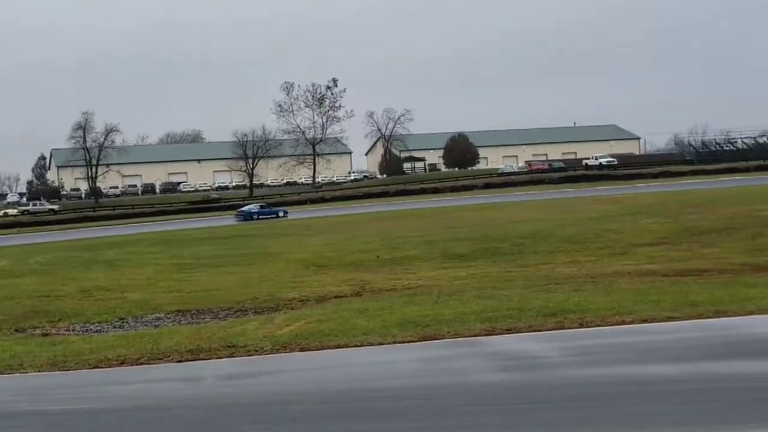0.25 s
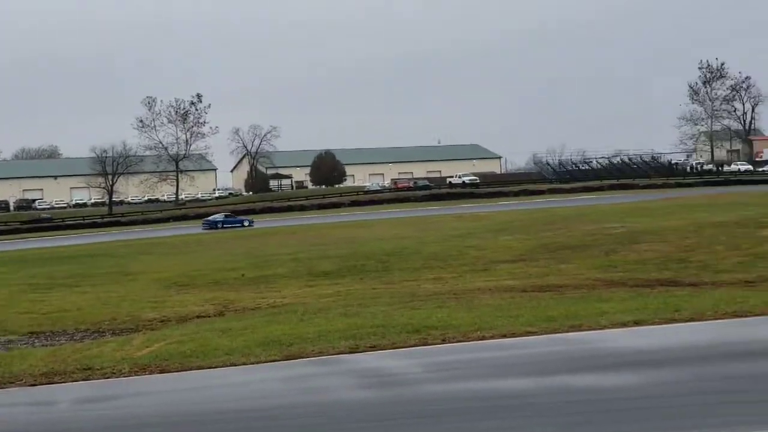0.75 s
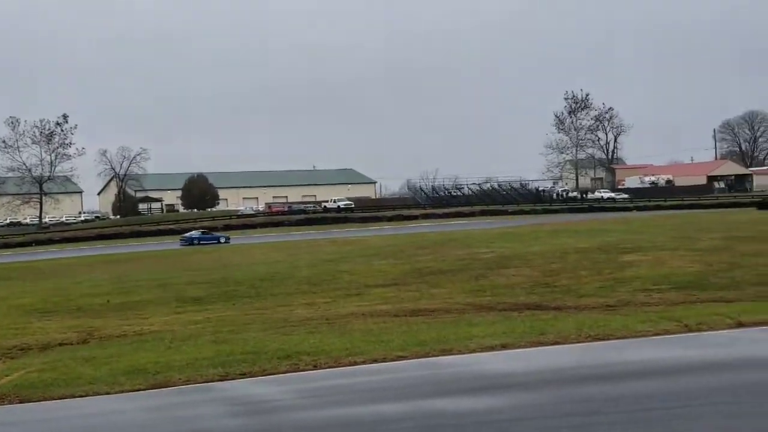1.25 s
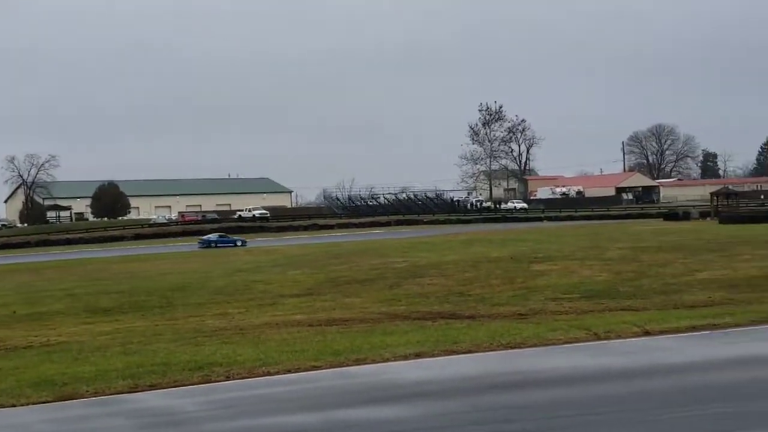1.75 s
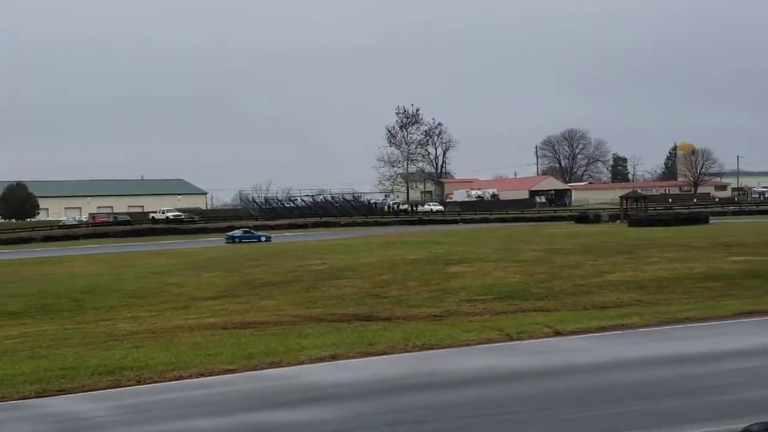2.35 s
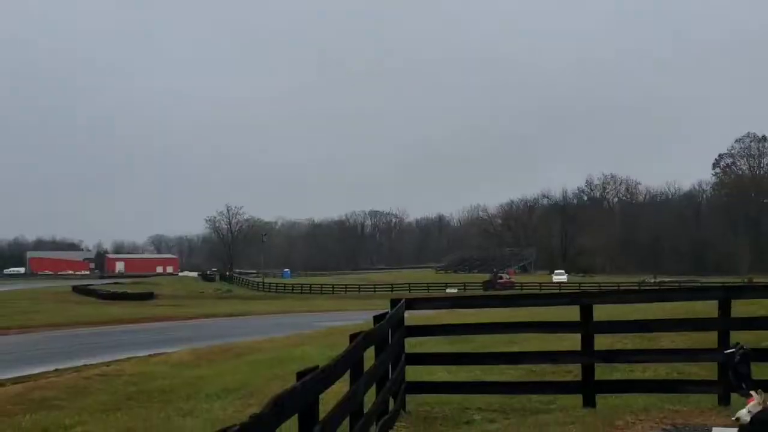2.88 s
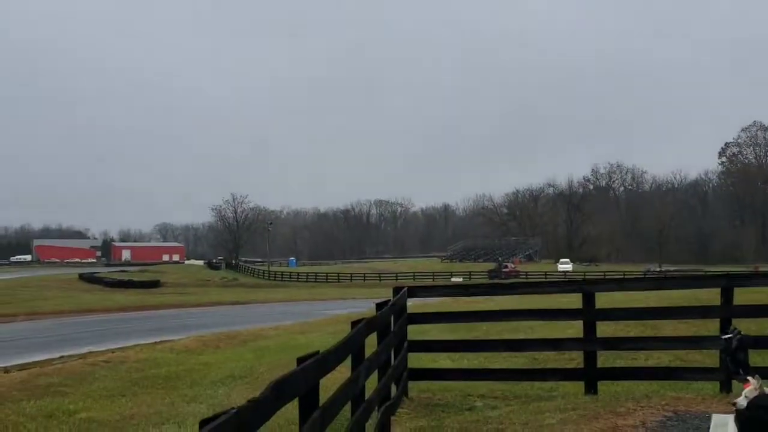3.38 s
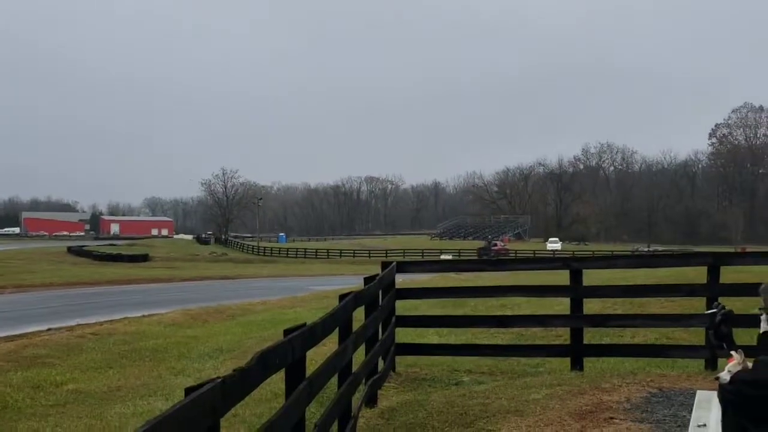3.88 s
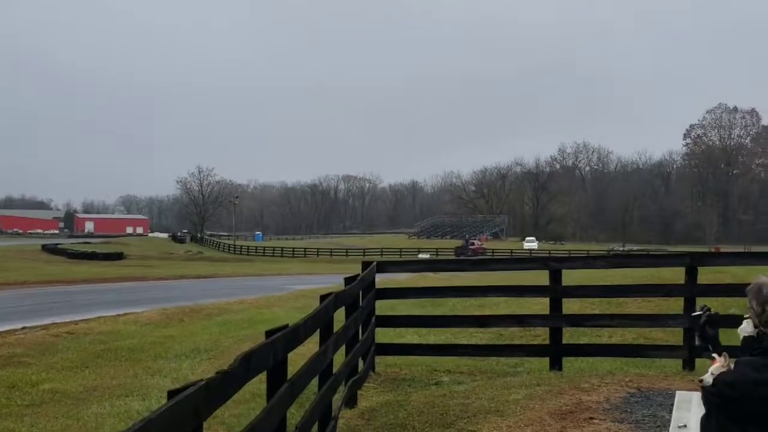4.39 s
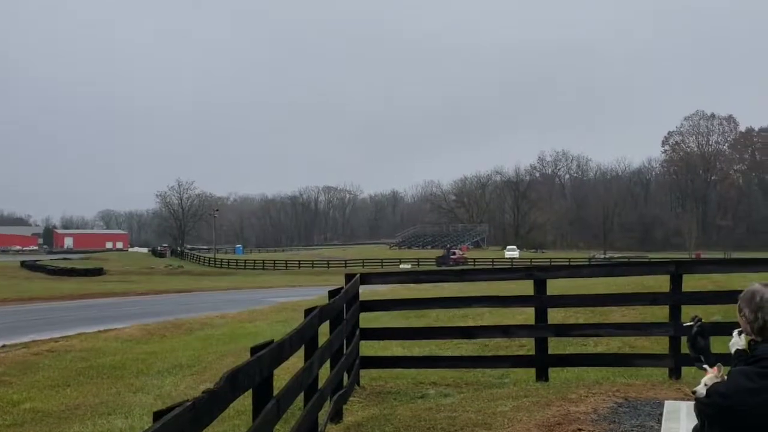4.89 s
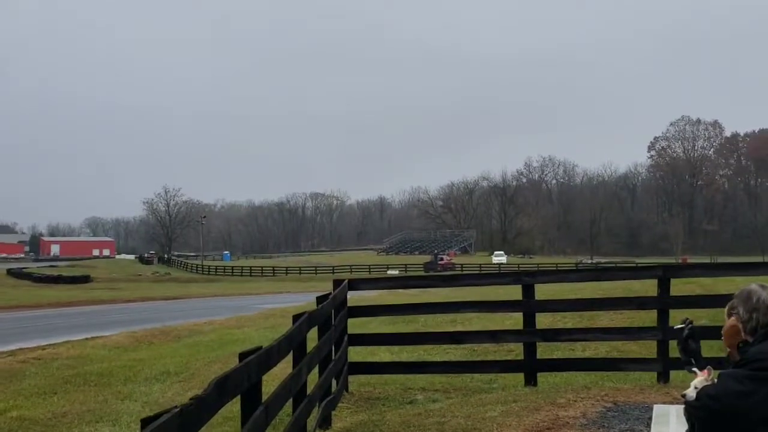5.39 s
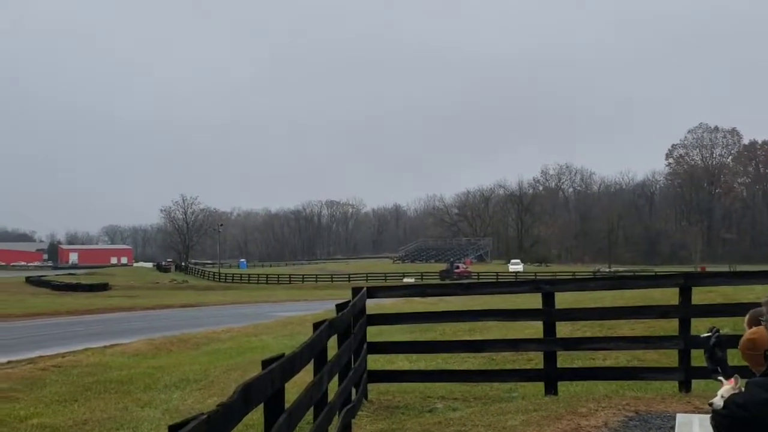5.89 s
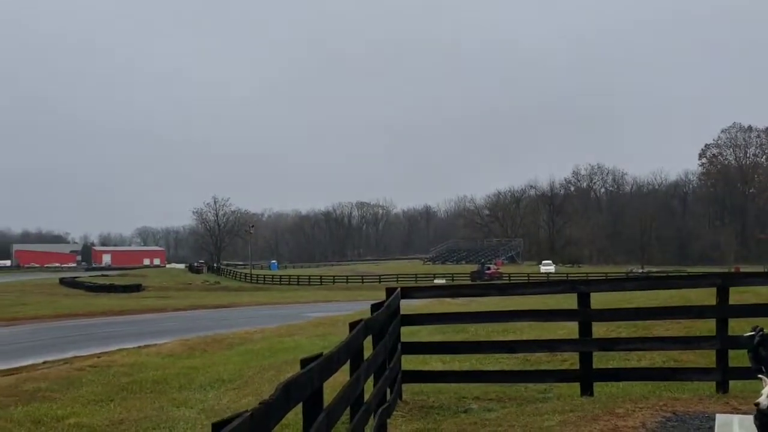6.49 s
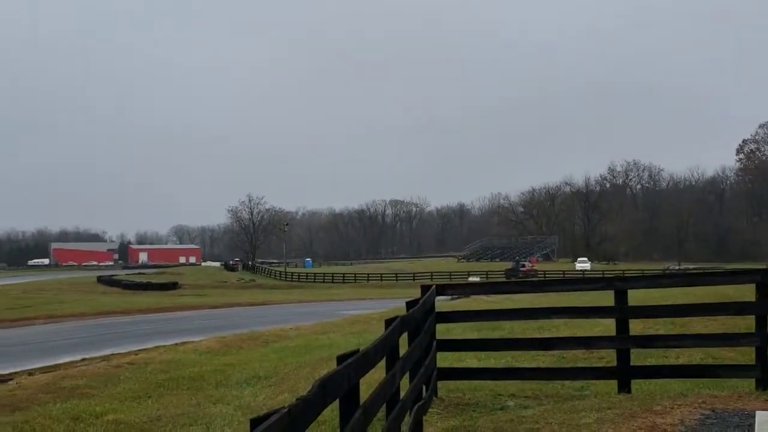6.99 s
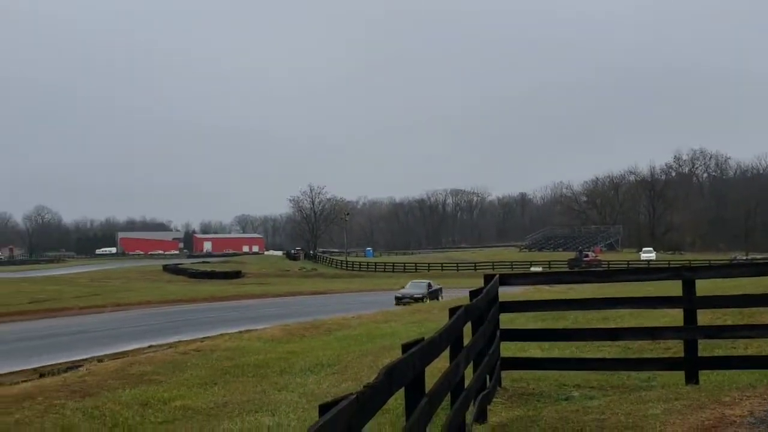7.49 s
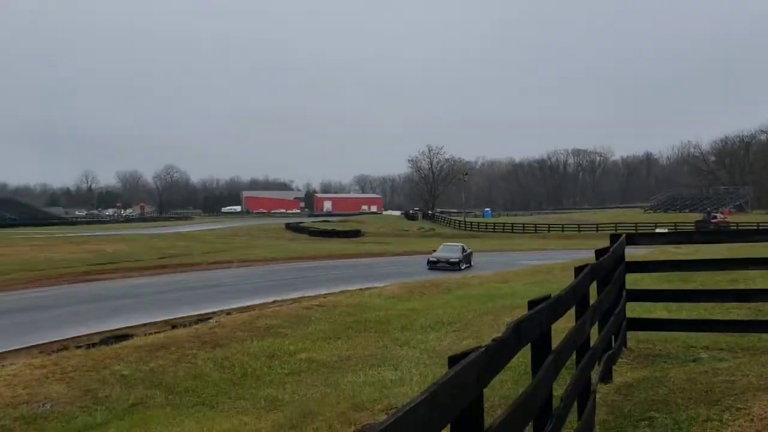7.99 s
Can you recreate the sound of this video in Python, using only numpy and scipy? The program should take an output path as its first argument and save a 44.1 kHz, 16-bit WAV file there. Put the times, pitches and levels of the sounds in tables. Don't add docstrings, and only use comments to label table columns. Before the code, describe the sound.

A car engine barks on and off throttle on a wet track, then a cut to distant revving engines and ragged tyre squeals over wet-road roar.

```python
import sys
import numpy as np
from scipy import signal
from scipy.fft import rfft, irfft, next_fast_len
from scipy.io import wavfile
from scipy.ndimage import uniform_filter1d

SR = 44100
rng = np.random.default_rng(int(sys.argv[2]) if len(sys.argv) > 2 else 0)


def generate_wav(signal):
    frames = np.transpose(np.atleast_2d(signal))
    scaled = np.clip(frames, -1, 1) * 32767
    pcm = np.round(scaled).astype(np.int16)
    wavfile.write(sys.argv[1], SR, pcm)


def voltage_ratio(level):
    return 10 ** (np.asarray(level, float) / 20)


N = 363823
TIME = np.arange(N) / SR
SECOND_SHOT_S = 2.886


def read(table):
    s, *columns = np.transpose(table)
    fade_s = .03
    gate = np.clip(np.minimum(TIME - s[0] + fade_s, s[-1] + fade_s - TIME) / fade_s, 0, 1)
    return [np.interp(TIME, s, c) for c in columns] + [gate]


def walk(rate):
    hold = max(int(SR / rate), 1)
    levels = rng.standard_normal(N // hold + 1)
    steps = np.repeat(levels, hold)[:N]
    slewed = uniform_filter1d(uniform_filter1d(steps, hold), hold)
    return slewed / slewed.std()


def band(hz, width, order=2):
    size = next_fast_len(N)
    bins_hz = np.arange(size // 2 + 1) * SR / size
    bell = np.exp(-.5 * np.abs((bins_hz - hz) / (width / 2)) ** order)
    noise = irfft(rfft(rng.standard_normal(size)) * bell, size)[:N]
    return noise / noise.std()


def bursts(rows, attack_s, release_s):
    s, length, db, *columns = np.transpose(rows)
    gain = 0
    for start, hold, level in zip(s, length, db):
        rise = np.clip((TIME - start) / attack_s + 1, 0, 1)
        gain = gain + voltage_ratio(level) * rise * np.exp(-np.maximum(TIME - start - hold, 0) / release_s)
    ends = np.ravel([s, s + length], "F")
    return [gain] + [np.interp(TIME, ends, np.repeat(c, 2)) for c in columns]


def stack(hz, orders, rough, rate, pipe=None):
    turn = 2 * np.pi * np.cumsum(hz) / SR
    out = 0
    for k, db in orders:
        lean = np.pi / 2 * (k % 1 > 0)
        fray = 1 + rough * (walk(rate) + 1j * walk(rate))
        lift = 1
        if pipe is not None:
            pipe_hz, width, floor_db = pipe
            lift = voltage_ratio(floor_db) + 1 / (1 + ((k * hz - pipe_hz) / width) ** 2)
        lift = lift / (1 + (83.3 / (k * hz)) ** 6)
        out = out + voltage_ratio(db) * lift * np.real(fray * np.exp(1j * (k * turn + lean)))
    return out * np.sqrt(2 / (1 + 2 * rough ** 2))


# multiple of the firing rate, level/dB; uneven cylinders fill in the quarter orders
NEAR_ORDERS = [(0.751, -24), (1, -1), (1.252, -27.5), (1.752, -31)]
# multiple, level/dB rms
LOPE_ORDERS = [(.5, -31), (1.5, -42.5), (2, -49)]


def near_exhaust(hz, tone_db, since, shut):
    tone = voltage_ratio(tone_db) * stack(hz, NEAR_ORDERS, rough=0.072, rate=38)
    lope_db = 4.5 * np.exp(-TIME / .35) - 7.5 * shut * np.exp(-since / 0.77)
    return tone + voltage_ratio(lope_db) * stack(hz, LOPE_ORDERS, rough=.12, rate=25)


# multiple of the firing rate, level/dB
BARK_ORDERS = [(2.248, -2), (2.503, 0), (2.752, -5.5), (2.999, 0.5), (3.25, -0.5), (3.5, 5), (3.748, -10.5),
               (4, -7.5), (4.25, 1.5), (4.504, -2.5), (5, -11), (5.497, -1.5)]
# f/Hz, width/Hz, floor level/dB
RASP = [
    (1386, 185, -12),
    (2120, 75, -28.5),
]


def near_bark(hz, since, shut):
    tailpipe = 652, 50, -17.5
    bark = stack(hz, BARK_ORDERS, rough=.13, rate=30, pipe=tailpipe)
    revs = hz / 190 - 1
    low = [(k, -13 - 45 * revs) for k in np.arange(6, 8.1, .5)]
    high = [(k, -22 + 60 * revs) for k in np.arange(8.5, 11.1, .5)]
    bark = bark + stack(hz, low, rough=0.28, rate=27, pipe=RASP[0])
    bark = bark + stack(hz, high, rough=0.51, rate=36, pipe=RASP[1])
    feather_db = -4.5 * np.exp(-((TIME - 0.79) / 0.084) ** 2)
    return voltage_ratio(-47 - 11.5 * shut - 27 * since + feather_db) * bark


# f/Hz, width/Hz, level/dB
SCRUB = [(1416, 46, 2.5), (1840, 910, -6), (2663, 290, -5.5), (3556, 210, -5), (4940, 82, -15.5),
         (6270, 340, -19.5)]
# start t/s, length t/s, level/dB
SLIDES = [(.3, 0.17, -60.5), (.8, .15, -64.5), (0, 0.18, -54.5), (.54, 0.17, -56), (1.02, 0.46, -57),
          (1.6, 1, -64)]
# start t/s, length t/s, level/dB
PUDDLES = [(0, .3, -64), (.52, 0.17, -62.5), (.85, 0.53, -83.5), (1.85, 0.95, -65.5)]


def near_tyres(hz, since, shut):
    turn = 2 * np.pi * np.cumsum(hz) / SR
    puff = 1 + .25 * np.cos(turn / 2) + .25 * np.cos(turn) + .1 * np.cos(turn / 4)
    tread = [voltage_ratio(db + 2.2 * walk(8.23)) * np.sqrt(w / 100) * band(f, w) for f, w, db in SCRUB]
    mist = voltage_ratio(-13.0) * band(11300, 2700, order=6)
    sheet = band(4040, 730, order=6) + voltage_ratio(-44) * band(11400, 250)
    slide, = bursts(SLIDES, attack_s=.06, release_s=0.078)
    splash, = bursts(PUDDLES, attack_s=0.099, release_s=0.14)
    low_scrub = voltage_ratio(-53 - 9 * TIME - 2.4 * shut) * tread[0]
    scrub = slide * voltage_ratio(-3.5) * (sum(tread[1:]) + voltage_ratio(-9 * since) * mist)
    return puff * (low_scrub + scrub + splash * voltage_ratio(3.0) * sheet)


# t/s, firing rate f/Hz
NEAR = [(0.0, 204.2), (0.42, 182), (0.86, 191), (1.04, 216.5), (1.21, 211), (1.6, 209.5), (2.09, 162.7),
        (2.53, 131.3), (2.86, 114)]
# t/s, level/dB
NEAR_DB = [(0, -22.5), (.33, -26), (.5, -26.5), (.88, -29), (.99, -44), (1.2, -30), (1.36, -24),
           (1.62, -25.5), (1.76, -31.5), (2.15, -39), (2.33, -31.5), (2.86, -31)]


def near_car():
    hz = read(NEAR)[0] * (1 + 0.002 * walk(24.38))
    tone_db, gate = read(NEAR_DB)
    since = np.maximum(TIME - 1.653, 0)
    shut = np.minimum(since / 0.033, 1)
    engine = near_exhaust(hz, tone_db, since, shut) + near_bark(hz, since, shut)
    return gate * (engine + near_tyres(hz, since, shut))


def far_car(speed, loudness, orders, rough):
    db, gate = read(loudness)
    hz = read(speed)[0] * (1 + 0.0022 * walk(20))
    return gate * voltage_ratio(db) * stack(hz, orders, rough, rate=22)


# t/s, firing rate f/Hz
CLIMBER = [(3.95, 110.5), (4.27, 161), (4.31, 140), (4.55, 156), (4.9, 174), (5.33, 205), (5.55, 156),
           (5.9, 113), (6.2, 106), (6.45, 113), (6.75, 142), (7.05, 154), (7.25, 143.7), (7.75, 173.9),
           (8.25, 217)]
CRUISER = [(2.9, 164.4), (3.4, 179.4), (3.9, 191.5), (4.35, 200.3), (4.7, 202.5), (5.4, 203)]
DRONER = [(2.88, 110), (3.3, 114.6), (4.1, 117.5), (4.5, 120), (5.8, 119)]
IDLER = [(4.1, 78), (5, 83), (5.6, 84), (5.9, 78), (6.8, 81), (8.25, 72)]
WHINER = [(4.2, 268), (4.7, 271), (5.3, 268), (5.65, 275)]
# t/s, level/dB
CLIMBER_DB = [(3.95, -35), (4.25, -31.5), (4.41, -40), (4.5, -35.5), (5.0, -37.5), (5.52, -38), (5.66, -66),
              (5.95, -47), (6.35, -34), (6.46, -54), (6.65, -39), (6.95, -38), (7.65, -39), (7.85, -43.5),
              (8.25, -36)]
CRUISER_DB = [(2.901, -45.5), (3.45, -41), (4.019, -41.5), (4.4, -43), (4.9, -45), (5.151, -31), (5.4, -48)]
DRONER_DB = [(2.88, -41.5), (3.1, -36.5), (3.6, -36), (4.15, -40), (4.3, -61), (4.699, -36.5), (5.099, -46),
             (5.8, -53)]
IDLER_DB = [(4.1, -49), (4.9, -45.5), (5.4, -48), (5.799, -34.5), (6.4, -50.5), (6.9, -42.5), (7.6, -51.5),
            (8.25, -40)]
WHINER_DB = [(4.2, -46), (4.45, -54.5), (5.3, -50.5), (5.65, -44)]
# t/s, level/dB
OVERRUN_DB = [(5.45, -53), (5.7, -46.5), (5.92, -57)]
# t/s, level/dB
BLIP_DB = [(4.04, -49.5), (4.13, -49), (4.21, -49.5)]
# multiple of the firing rate, level/dB
CLIMBER_ORDERS = [(.5, -40), (1, 1), (1.5, -20.5), (2, -15), (2.5, -30), (3, -30)]
CRUISER_ORDERS = [(.5, 6), (1, 2), (1.5, -10), (2, -15), (3, -28.5), (3.5, -24.5), (4, -25)]
PLAIN_ORDERS = [(1, -2), (2, -29), (3, -14.5)]
BLIP_ORDERS = [(2, -0.5), (3, -7), (4, -16), (4.5, -12)]


def far_cars():
    cars = far_car(CLIMBER, CLIMBER_DB, CLIMBER_ORDERS, 0.18)
    cars = cars + far_car(CLIMBER, BLIP_DB, BLIP_ORDERS, 0.18)
    cars = cars + far_car(CLIMBER, OVERRUN_DB, [(1.2, 0)], 0.51)
    cars = cars + far_car(CRUISER, CRUISER_DB[:3], CRUISER_ORDERS, 0.24)
    cars = cars + far_car(CRUISER, CRUISER_DB[2:], PLAIN_ORDERS[:1], 0.66)
    cars = cars + far_car(DRONER, DRONER_DB, PLAIN_ORDERS[:2], 0.074)
    cars = cars + far_car(IDLER, IDLER_DB, PLAIN_ORDERS, 0.21)
    return cars + far_car(WHINER, WHINER_DB, PLAIN_ORDERS[:1], 0.097)


def squeal(gain, slip, orders, rough, jitter):
    hz = slip * (1 + jitter * (walk(1200) + .15 * walk(40)))
    sputter = voltage_ratio(1.6 * walk(30) + 1.5 * walk(90))
    return gain * sputter * stack(hz, orders, rough, rate=300)


# start t/s, length t/s, second partial level/dB, slip rate f/Hz, third partial level/dB
SQUEAL = [(6.59, .14, -49.5, 1156, -4.5), (6.78, 0.058, -53.5, 1197, -6.5), (6.87, .17, -51.5, 1170, -6.5),
          (7.13, 0.12, -51, 1233, -1.5), (7.32, 0.27, -53.5, 1192, -10.5), (7.66, 0.19, -59.5, 1217, -17),
          (7.9, 0.12, -69.5, 1215, -12)]
# multiple of the slip rate, level/dB (the upper two ride on the third)
SQUEAL_ORDERS = [(2, 0), (4, -13), (5, -19)]
# start t/s, length t/s, level/dB, slip rate f/Hz
RAGGED = [(5.37, 0.13, -62, 1398), (6.02, 0.13, -56.5, 1418), (6.21, 0.36, -58, 1420),
          (6.58, 0.28, -52, 1403), (6.88, 0.165, -55.5, 1440), (7.1, .7, -55.5, 1450)]
# multiple of the slip rate, level/dB
RAGGED_ORDERS = [(1.04, -3), (2, -4), (3, -13), (3.999, -23)]
# start t/s, length t/s, level/dB, slip rate f/Hz
CHIRP = [(1.77, 0.058, -58, 2150), (1.93, 0.073, -57, 2360), (4.96, .1, -66, 1416), (5.33, .04, -63, 1330),
         (5.4, .03, -62, 1638), (5.46, .1, -61.5, 1565), (5.6, .18, -67, 1560), (5.9, .07, -63, 1800),
         (6.11, .12, -58, 1610), (6.27, .22, -64, 1560)]


def tyres():
    gain, slip, third_db = bursts(SQUEAL, attack_s=0.034, release_s=0.053)
    slip = slip * (1 + .0035 * walk(22))
    first_db = -1.5 - 5.5 * (TIME - SQUEAL[0][0])
    first_jitter = .008 + .03 * np.clip(TIME - 7.1, 0, .5)
    second = SQUEAL_ORDERS[:1]
    upper = [(k, db + third_db + 3 * walk(14)) for k, db in [(3, 0)] + SQUEAL_ORDERS[1:]]
    out = squeal(gain, slip, [(1, first_db)], .3, first_jitter)
    out = out + squeal(gain, slip, second + upper, .55, .017)
    out = out + voltage_ratio(-5) * squeal(gain, 1.045 * slip, second + [(3, third_db - 5)], .6, .022)
    out = out + squeal(*bursts(RAGGED, attack_s=.03, release_s=.04), RAGGED_ORDERS, .7, .055)
    return out + squeal(*bursts(CHIRP, attack_s=.04, release_s=.03), PLAIN_ORDERS[:1], .55, .018)


def at(hz, table):
    table_hz, db = np.transpose(table)
    return np.interp(np.log(hz), np.log(table_hz), db)


# t/s, nearness level/dB, wheelspin level/dB
ROAD = [
    [(0, 4.5, 4.5), (.4, -1.5, 2), (.95, 1, 0), (1.1, 2.5, 4), (1.55, 0, -0.5), (1.9, -1, -0.5),
     (2.45, -6, 4), (2.86, -5.5, 0.5)],
    [(2.88, -0.5, -4.5), (3.4, -1.5, 3), (5.55, 1.5, 0.5), (5.63, 0.5, -2), (5.98, 0.5, -1.5),
     (6.02, -2.5, 5.5), (6.5, -3, 6), (6.6, -4, 12), (7.0, -3, 9.5), (7.1, -2, 3), (7.75, 2, 0),
     (8.25, 5, -0.5)],
]
# f/Hz, level/dB per Hz
COLOURS = [
    [(15, -48), (25, -18.5), (86, 2), (169, 3), (282, -9), (434, -25), (667, -17), (972, -31.5),
     (1710, -32), (2010, -30), (2930, -33), (3640, -25), (4510, -43), (6580, -34.5), (15600, -70)],
    [(15, -51), (25, -37.5), (80, 5.5), (174, 0.5), (227, -11), (267, -8), (350, -12.5), (470, -21.5),
     (632, -19.5), (1080, -26), (2360, -31), (5750, -40), (8380, -72), (15600, -71.5)],
]
# f/Hz, level gained/dB per dB of nearness
NEARNESS = [(150, 0.14), (900, 1.5), (5500, 0.66), (9000, 2.14)]
# f/Hz, level gained/dB per dB of wheelspin
WHEELSPIN = [(150, -0.01), (900, 0.4), (5500, 1.0), (9000, -0.9)]


def road():
    out, swell = 0, walk(7)
    shots = [read(table) for table in ROAD]
    for hz in 28 * 2 ** np.arange(0, 9.2, 1 / 4):
        gain = 0
        for (near_db, spin_db, gate), colour, trim_db in zip(shots, COLOURS, (-62.5, -66.5)):
            change = near_db * at(hz, NEARNESS) + spin_db * at(hz, WHEELSPIN)
            gain = gain + gate * voltage_ratio(at(hz, colour) + change + trim_db)
        flicker = voltage_ratio(.8 * swell + walk(9))
        out = out + gain * flicker * np.sqrt(hz / 4) * band(hz, hz / 4.5)
    return out + voltage_ratio(-71 + 33 * (TIME - 8.3)) * band(6500, 5500)


def ground(x):
    hz, width, depth = 1733, 37, .75
    size = next_fast_len(N)
    bins_hz = np.arange(size // 2 + 1) * SR / size
    notch = 1 - depth * np.exp(-.5 * ((bins_hz - hz) / width) ** 2)
    return irfft(rfft(x, size) * notch, size)[:N]


# f/Hz, level/dB rms
LENS = [(3967, -95), (4942, -74.5), (6352, -85.5), (7763, -83.5), (9179, -96)]
# start t/s, length t/s, level/dB, f/Hz, edge softness t/s
RUSTLE = [(1.331, 0.22, -70.5, 12800, .12), (3.43, 0.12, -83, 13500, 0.049), (4.27, 0.06, -75, 14800, .03),
          (4.38, 0.3, -78.5, 14030, .04), (5.073, 0.017, -84, 14600, .03),
          (5.25, 0.022, -88.5, 14850, 0.034)]
# t/s, peak level/dB, f/Hz
TICKS = [(4.1294, -64, 4940), (4.281, -67, 5720), (4.4296, -60, 4870), (4.649, -66, 4910)]


def camera():
    motor = sum(voltage_ratio(db) * np.sqrt(2) * np.sin(2 * np.pi * hz * TIME) for hz, db in LENS)
    whirr = voltage_ratio(-63) * band(2070, 1300, order=4) + voltage_ratio(-81.5) * band(7400, 2500)
    on = (TIME > SECOND_SHOT_S) & (TIME < 4.27)
    hiss = voltage_ratio(-87.0) * band(12000, 9000, order=4)
    out = on * (motor + whirr) + hiss
    grain = voltage_ratio(2.5 * walk(600))
    for *rub, cloth_hz, edge_s in RUSTLE:
        out = out + bursts([rub], edge_s, edge_s)[0] * grain * band(cloth_hz, 4000)
    for s, db, hz in TICKS:
        decay = (TIME > s) * np.exp(-np.abs(TIME - s) / 0.014)
        out = out + voltage_ratio(db) * decay * band(hz, 5000)
    return out


def scene():
    cars = near_car() + far_cars() + tyres()
    lag = TIME[:SR]
    echo = rng.standard_normal(SR) * np.exp(-np.log(1000) * lag / 1.3) * (lag > .03)
    echo = echo / np.linalg.norm(echo)
    first = TIME < SECOND_SHOT_S
    wet = sum(part * signal.fftconvolve(cars * part, echo)[:N] for part in (first, ~first))
    field = cars + voltage_ratio(-10.0) * wet + road()
    return (np.where(first, ground(field), field) + camera())[None]


def low_pass(x):
    return signal.sosfilt(signal.butter(12, 15710, fs=SR, output="sos"), x)


# t/s, gain
CUT = [(0, 1), (2.84, 1), (2.8535, .6), (2.854, 0), (2.886, 0), (2.8865, .7), (3.05, 1), (9, 1)]


def record(dry):
    mix = dry * np.interp(TIME, *np.transpose(CUT))
    return low_pass(mix)


dry = scene()
out = record(dry)
generate_wav(out)
```